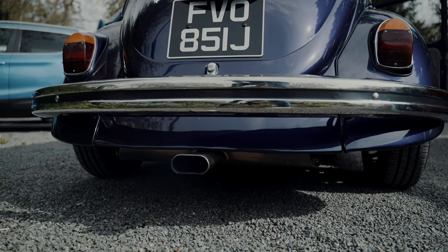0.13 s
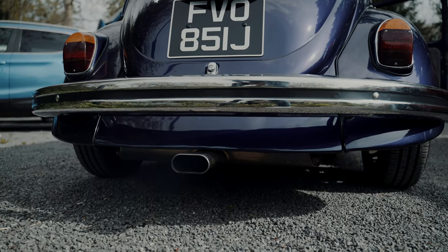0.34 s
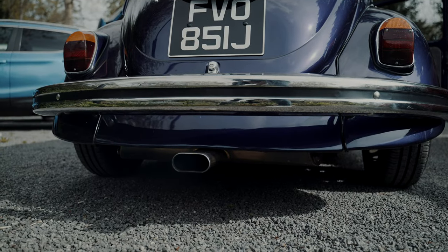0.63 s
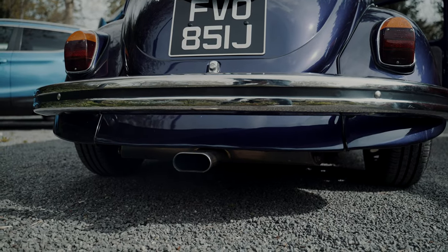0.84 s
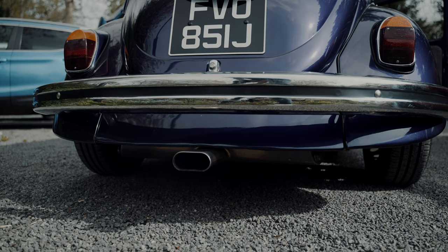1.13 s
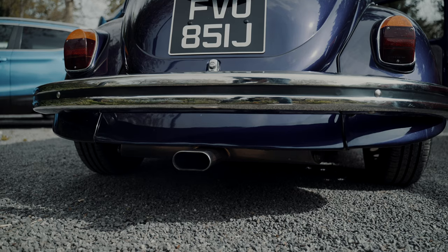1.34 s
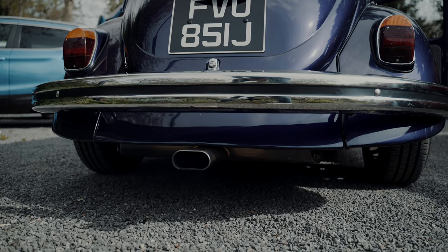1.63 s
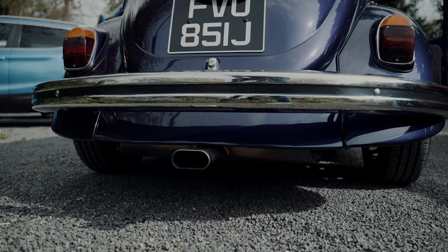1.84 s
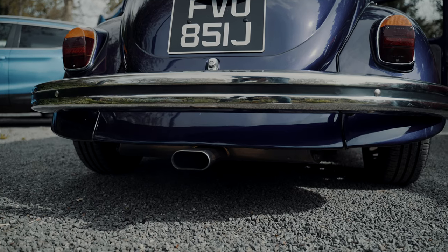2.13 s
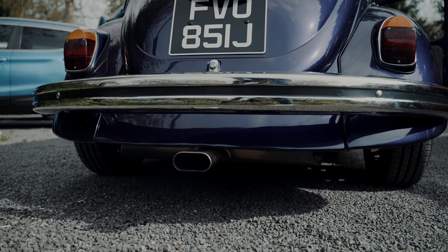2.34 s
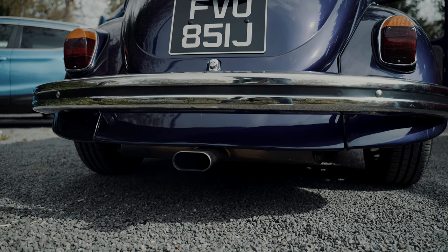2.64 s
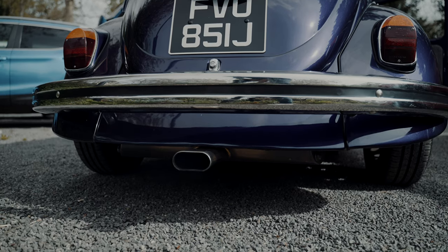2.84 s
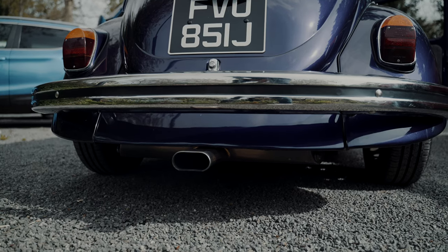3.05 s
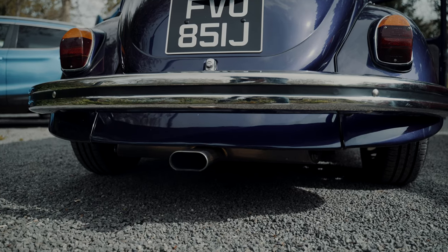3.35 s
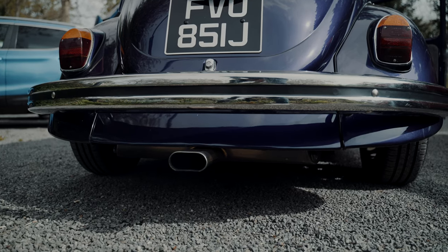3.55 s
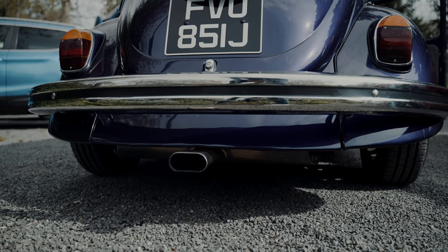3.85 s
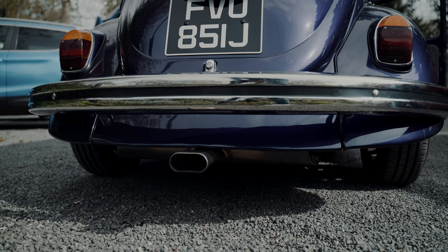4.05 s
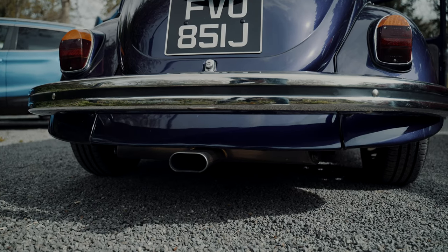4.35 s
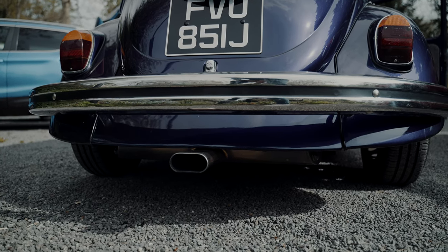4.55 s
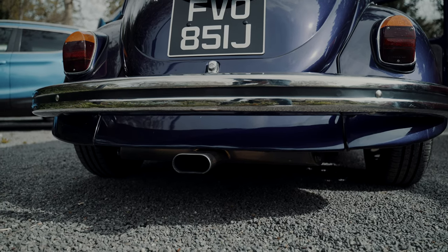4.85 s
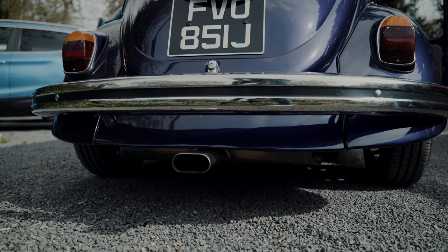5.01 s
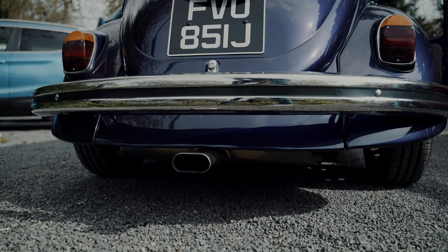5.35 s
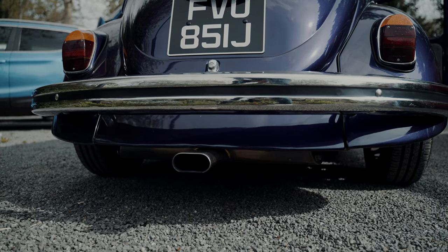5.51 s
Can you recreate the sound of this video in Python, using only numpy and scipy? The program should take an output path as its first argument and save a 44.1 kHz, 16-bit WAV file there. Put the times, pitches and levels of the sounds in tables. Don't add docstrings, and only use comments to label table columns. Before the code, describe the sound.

A classic air-cooled four-cylinder car engine runs throughout, heard close and low behind its tailpipe outdoors, dry, in stereo leaning slightly right in the bass. At 0 s it idles lumpily, about forty firings a second, with strong and faint beats alternating and a few misfires. From 0.4 to 0.8 s the revs climb moderately, by about a quarter; the exhaust gets faster and breathier and holds, edging up until 1.8 s. The throttle then shuts: hiss and boom duck and pitch falls quickly to idle by about 2.1 s. From there to the end near 5.6 s it putters on, wavering slightly, with frequent skipped beats and a sharp pop around 2.7 s, more small cracks near 3.7, 4.1 and 5 s. Every firing combines a low thump, a hollow, boxy silencer ring in the midrange and a rough puff of gas. Fan rush, valve-gear whirr and faint whine continue underneath.

```python
import sys
import numpy as np
from scipy import signal
from scipy.fft import rfft, irfft
from scipy.io import wavfile
from scipy.ndimage import uniform_filter1d

SR = 44100
rng = np.random.default_rng(int(sys.argv[2]) if len(sys.argv) > 2 else 0)


def wav_record(signal):
    frames = np.transpose(np.atleast_2d(signal))
    bounded = np.clip(frames, -1, 1)
    quanta = np.round(bounded * 32767).astype(np.int16)
    wavfile.write(sys.argv[1], SR, quanta)


def gain_from_db(level_db):
    decades = np.asarray(level_db, float) / 20
    return 10 ** decades


N = 250488

# (time [s], share of the charge that burns [0-1], change of the jet [dB])
MISFIRES = [(-0.036, 0.0, -9), (-0.011, 0.0, -8), (0.04, 0.0, -29), (0.238, 0.4, -3), (0.337, 0.4, -10),
            (1.449, 0.8, -4), (1.742, 0.8, -17), (1.84, 0.3, -30), (2.091, 0.0, -10), (2.299, 0.0, -7),
            (2.516, 0.4, -33), (2.733, 0.8, -10), (2.95, 0.4, -36), (3.169, 0.2, -15), (3.498, 0.2, -27),
            (4.129, 0.8, -5), (4.237, 0.8, -3), (4.96, 0.6, -11), (5.267, 0.5, -6), (5.368, 0.5, -4),
            (5.469, 0.6, -1)]
# (from [s], to [s])
THROTTLE_SHUT = (1.85, 2.05)


def read(points, hz):
    f, value = np.transpose(points)
    return np.interp(np.log(hz + 1), np.log(f + 1), value)


def evened(x):
    return x / np.sqrt(np.mean(x ** 2))


def peak(hz, centre, width):
    return 1 / (1 + (2 * (hz - centre) / width) ** 2)


def ring(x, hz, width):
    pole = np.exp((2j * np.pi * hz - np.pi * width) / SR)
    return 2 * signal.lfilter([1 - abs(pole)], [1, -pole], x + 0j).real


def air(colour_db, patchy_db):
    # (frequency [Hz], left-right likeness [0-1])
    likeness = [(60, 0.33), (130, 1), (290, 0.61), (640, 0.91), (1200, 0.45), (2400, 0.94), (5000, 0.32),
                (15000, 0.17)]
    hz = np.fft.rfftfreq(512, 1 / SR)
    a, b, c, d, patches = rng.standard_normal((N // 128 + 5, 257, 5)).T
    patches = uniform_filter1d(patches, size=5, axis=0)
    patches = evened(uniform_filter1d(patches, size=5, axis=1))
    same = np.clip(read(likeness, hz), 0, 1)[:, None]
    left = a + 1j * b
    right = same * left + np.sqrt(1 - same ** 2) * (c + 1j * d)
    z = np.array([left, right]) * gain_from_db(colour_db(hz)[:, None] + patchy_db * patches)
    return evened(signal.istft(z, nperseg=512, noverlap=384)[1][:, :N])


def firings():
    # (time [s], crank speed [rpm])
    crank_speed = [(0, 1195.1), (0.4, 1223.3), (0.8, 1479.1), (1.1, 1487.0), (1.35, 1536.0), (1.45, 1512.3),
                   (1.8, 1556.2), (2.1, 1121.7), (2.2, 1195.1), (2.3, 1105.0), (2.9, 1105.1),
                   (3.25, 1081.3), (3.8, 1161.2), (4.25, 1109.1), (4.6, 1186.6), (5.05, 1162.2),
                   (5.2, 1184.0), (5.7, 1187.4)]
    tick = 1e-4
    t = np.arange(-1000, 57000) * tick
    counted = np.cumsum(np.interp(t, *np.transpose(crank_speed)) / 30) * tick
    counted = counted - counted[1000] - .575
    at = np.interp(np.arange(-4, int(counted[-1])), counted, t)
    return at, 1 / np.gradient(at) / 40


def per_firing(at, table, usual):
    out = np.full((len(table[0]) - 1, len(at)), usual)
    for row in table:
        out[:, abs(at - row[0]).argmin()] = row[1:]
    return out


def strengths(at):
    # (time [s], flow [dB])
    gas_flow = [(0, -27), (.3, -23), (.48, -22), (1.1, -24), (1.82, -26.5), (1.86, -36), (2.04, -31.5),
                (2.14, -28), (3.3, -29), (3.9, -30), (4.8, -27.5), (5.35, -27.5), (5.7, -31.5)]
    # (time [s], silencer change [dB], crack change [dB])
    odd_firings = [(0.263, -13, -6), (0.552, 4, -1), (0.684, 13, -8), (0.768, -9, 0.5), (1.072, 4, -3),
                   (1.272, 9, 3), (1.468, 10, 4), (1.547, 3, 8), (1.587, 6, 5), (1.684, 2.5, 3),
                   (1.781, 8, 9), (2.142, 13, 0.5), (2.194, 9, -1), (2.353, 1, -1), (2.516, 15, -3),
                   (2.652, -13, 3), (2.95, 13, -8), (2.733, 7, 19.5), (3.059, -3, 3), (3.71, 4, 10),
                   (3.736, 5, 1), (4.023, -1, 8), (4.129, 2, 9), (4.552, 6, 6), (4.679, 5, 2),
                   (4.832, 3, -4), (4.96, 8, 11), (5.267, 8, 8), (5.368, 6, 7), (5.596, 4, 8)]
    # (faint bank [dB], booming bank [dB])
    lumpy_banks = [-4, 3.5]
    # (jet [dB], silencer [dB], crack [dB])
    scatter = [1.4, 1.2, 3.]
    flow_db = np.interp(at, *np.transpose(gas_flow))
    burn = per_firing(at, MISFIRES, 1.)[0]
    lost_db = per_firing(at, MISFIRES, 0.)[1]
    odd_boom_db, odd_crack_db = per_firing(at, odd_firings, 0.)
    jet_chance, boom_chance, crack_chance = (rng.standard_normal((len(at), 3)) * scatter).T
    shut_from, shut_to = THROTTLE_SHUT
    since = np.maximum(at - shut_from, 0)

    jet_db = flow_db + lost_db + jet_chance

    boom_db = -21.5 + 0.067 * (flow_db + 25)
    boom_db += -6. * (since > 0) * np.exp(-since / 0.83)
    boom_db += 0.57 * since
    boom_db += (at < .4) * np.resize(lumpy_banks, len(at))
    boom_db += 0.5 * (1 - burn)
    boom_db += 0.55 * odd_boom_db + boom_chance * (odd_boom_db == 0)

    coasting = (since > 0) * (at < shut_to)
    crack_db = flow_db + 0.89 * lost_db + 1 * coasting
    crack_db += np.where(odd_crack_db == 0, -2.5 - abs(crack_chance), 0.77 * odd_crack_db)
    return jet_db, boom_db, crack_db


def bursts(at, db, shape):
    train = np.zeros(N + SR)
    train[np.round(at * SR).astype(int) + SR // 2] = gain_from_db(db)
    return signal.oaconvolve(train, shape)[SR // 2:][:N]


def low_rumble():
    return gain_from_db(-50.0) * evened(ring(ring(rng.standard_normal(N), 27, 30), 27, 30))


def fan(at, speed):
    # (frequency [Hz], level per Hz [dB])
    fan_colour = [(470, -0.5), (800, -10.5), (1510, -8.5), (1680, -4), (1930, -12), (2130, -5),
                  (4610, -13.5), (6600, -19), (9950, -22.5), (15600, -36)]
    # (multiple of crank speed, level [dB], silencer resonance [Hz], width [Hz])
    whines = [(28, -33, 552, 28), (15, -37, 380, 50), (12, -32, 268, 44), (11, -33, 280, 40)]
    t = np.arange(N) / SR
    turns_per_s = 20 * np.interp(t, at, uniform_filter1d(speed, size=3))
    speed = np.interp(t, at, speed)
    turns = np.cumsum(turns_per_s) / SR
    whine = sum(gain_from_db(db) * peak(k * turns_per_s, resonance_hz, width) * np.sin(2 * np.pi * k * turns)
                for k, db, resonance_hz, width in whines)
    shut_from, shut_to = THROTTLE_SHUT
    coasting = 1. * (t > shut_from) * (t < shut_to + .2)
    loaded = 1 - .8 * uniform_filter1d(coasting, size=2000)
    rush = gain_from_db(-31.0) * speed ** 0.56 * air(lambda hz: read(fan_colour, hz), 2.5)
    return rush + loaded * whine


def jet(at, jet_db):
    # (frequency [Hz], level per Hz [dB])
    jet_colour = [(470, -68), (800, -1), (1060, -56), (1510, -10.5), (2160, -14), (2510, -14.5),
                  (4610, -8.5), (6360, -5), (8780, -7.5), (9820, -4.5), (15600, -20)]
    # (frequency [Hz], width [Hz], strength [tenths of a dB, counted from -69])
    pipe_modes = [(1400, 430, 89), (1600, 47, -29), (2140, 180, 46), (2840, 26, 38), (4360, 450, -1),
                  (5150, 110, -24), (5650, 170, -4), (6480, 150, 28), (7120, 125, 27), (8230, 180, 0),
                  (9750, 440, -40), (10690, 21, -21), (10960, 76, -44)]
    ms = np.arange(3000) * 1000 / SR
    jet_db = jet_db + .9 * rng.standard_normal(len(at))
    gust = (1 - np.exp(-ms / 2.94)) * np.exp(-ms / 10.2)
    gust += 0.055 * np.exp(-.5 * ((ms - 11.) / 7.2) ** 2)

    def colour_db(hz):
        return read(jet_colour, hz) + sum(0.1 * (db + 69) * peak(hz, f, width) for f, width, db in pipe_modes)

    grain = gain_from_db(0.5 * evened(uniform_filter1d(rng.standard_normal(N), size=50)))
    return gain_from_db(5.0) * air(colour_db, 3.8) * grain * bursts(at, jet_db, gust)


def cracks(at, crack_db):
    # (frequency [Hz], width [Hz], level [dB])
    modes = [(2110, 170, 4), (2250, 170, 4), (1680, 200, -3), (2850, 200, -2), (3400, 260, -10), (4250, 260, -12)]
    mix_db = 3.2 * rng.standard_normal((len(at), 6))
    out = np.zeros(N)
    for k, (hz, width, db) in enumerate(modes):
        snaps = bursts(at + .0012, crack_db + db + mix_db[:, k], np.hanning(6) / 2)
        out += ring(ring(snaps, hz, width), hz, width).reshape(N)
    return gain_from_db(34.) * out


def silencer(at, boom_db):
    # (delay [ms], strength)
    knocks = [
        [(2.4, 0.56), (19., 0.1)],
        [(.6, 0.39), (4.6, -0.3), (10., 0.21), (16., 0.27)],
    ]
    # (frequency [Hz], width [Hz], level [dB])
    box_modes = [(600.8, 40, -2.5), (563.9, 92, -3), (634.3, 4.8, -10), (495, 124, -7.5), (737, 47, -6),
                 (264, 119, -8)]
    boom_db = boom_db + 0.14 * rng.standard_normal(len(at))
    at = at + .00012 * rng.standard_normal(len(at))
    fronts = np.zeros(N)
    for k, bank in enumerate(knocks):
        for lag, strength in bank:
            fronts += strength * bursts(at[k::2] + lag / 1000, boom_db[k::2], np.hanning(12))
    gas = air(lambda hz: 0 * hz, 0.4) * bursts(at, boom_db, np.hanning(1600) ** 3)
    drive = gain_from_db(35.) * fronts + gain_from_db(15.5) * gas
    out = 0
    for hz, width, db in box_modes:
        width = 1.053 * width
        out = out + gain_from_db(db) * ring(ring(drive, hz, width), hz, width)
    return out


def thumps(at, speed):
    # (delay [ms], pressure)
    long_pipe = [(1.8, -.32), (6.5, .36), (11.9, -.33), (14.6, -.34), (19.1, .19), (24.8, .25)]
    short_pipe = [(1.7, -.22), (6, .44), (8.6, -.26), (14.6, -.34), (19.5, -.07), (20.8, .14), (31.3, .06)]
    # (delay [ms], pressure)
    unburnt = [(6.9, .08), (9.2, -.35), (16.6, -.08), (19.1, .15), (23.5, -.19), (29.8, .08)]
    coasting = [(-1.7, .1), (4.4, .2), (10.5, -.27), (12.1, -.26), (15.1, -.24), (19.9, .27), (23.4, .1)]
    out = np.zeros(N + SR)
    ms = np.arange(-500, 2200) * 1000 / SR
    burn = per_firing(at, MISFIRES, 1.)[0]
    wobble = rng.standard_normal((len(at), 2))
    swirl = rng.standard_normal((len(at), 7))
    shut_from, shut_to = THROTTLE_SHUT
    for k, s in enumerate(at):
        hot = (ms + 6.8 * (speed[k] - 1) + .2 * wobble[k, 0]) * speed[k] ** .24

        def wave(echoes, uneven=.06):
            return sum(p * (1 + uneven * u) * np.exp(-.5 * ((hot - lag) / 1.5) ** 2)
                       for (lag, p), u in zip(echoes, swirl[k]))

        if shut_from < s < shut_to:
            push = (1.12 - 0.35 * (k % 2) + 0.08 * wobble[k, 0]) * wave(coasting, uneven=.3)
        else:
            cylinder = (1, 1, 1, 1.2)[k % 4]
            fired = cylinder * speed[k] ** -.65 * wave((long_pipe, short_pipe)[k % 2])
            push = burn[k] * fired + (1 - burn[k]) * wave(unburnt)
        start = round(s * SR) + SR // 2 - 500
        out[start:][:len(ms)] += gain_from_db(.8 * wobble[k, 1]) * push
    no_deep_bass = signal.butter(2, 50, "high", fs=SR, output="sos")
    return gain_from_db(.3) * signal.sosfilt(no_deep_bass, out)[SR // 2:][:N]


def scene():
    at, speed = firings()
    jet_db, boom_db, crack_db = strengths(at)
    engine = low_rumble() + fan(at, speed)
    tip = jet(at, jet_db) + cracks(at, crack_db)
    pipe = silencer(at, boom_db) + thumps(at, speed)
    return engine + tip + pipe


def roll_off(x):
    return signal.sosfilt(signal.butter(12, 15700, fs=SR, output="sos"), x)


def record(dry):
    # (frequency [Hz], width [Hz], change [dB])
    tone_dips = [(318.4, 84, -12), (202, 56, 3), (372.4, 71, 0.5), (745, 19, -30), (1532, 113, -13),
                 (3730, 102, -13), (4554, 130, -10), (15400, 700, -4)]
    # (frequency [Hz], left over right [dB])
    lean = [(60, -2.5), (110, -3.5), (200, -3), (380, -2), (700, -4), (1290, 1.5), (2380, -4.5),
            (4400, -0.5), (8120, 2), (15000, -4.5)]
    # (frequency [Hz], phase by which the left leads [radians])
    lead = [(60, .15), (1030, .5), (1460, -.2), (3450, .5), (4570, 2.4), (5600, -.5), (7000, .4),
            (15000, .8)]
    hz = np.fft.rfftfreq(N, 1 / SR)
    colour_db = sum(db * peak(hz, f, width) for f, width, db in tone_dips)
    colour_db = colour_db - 14 / (1 + (hz / 27) ** 8)
    level_db = colour_db + np.outer([.5, -.5], read(lean, hz))
    phase = np.outer([.5, -.5], read(lead, hz))
    heard = irfft(rfft(dry) * gain_from_db(level_db) * np.exp(1j * phase), N)
    limited = 1.081 * np.tanh(heard / 1.103)
    return roll_off(limited)


dry = scene()
out = record(dry)
wav_record(out)
```